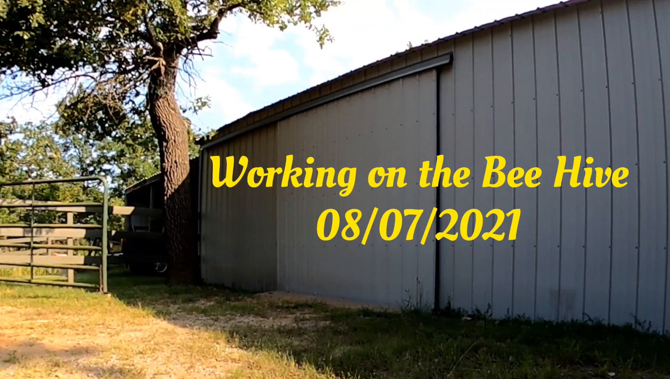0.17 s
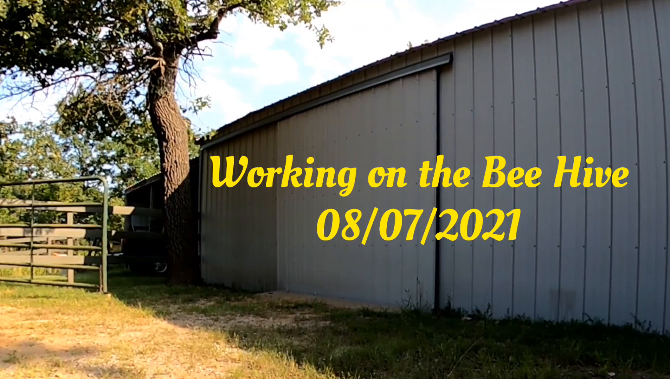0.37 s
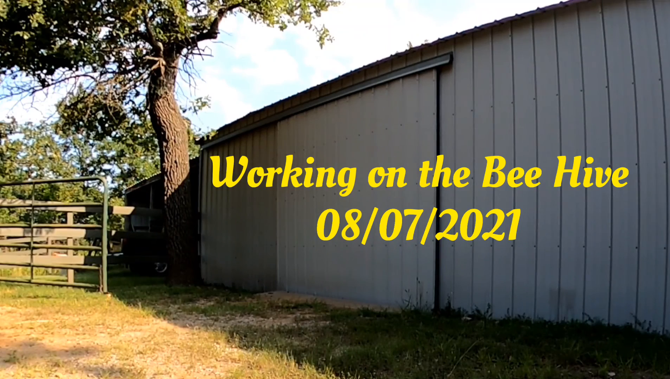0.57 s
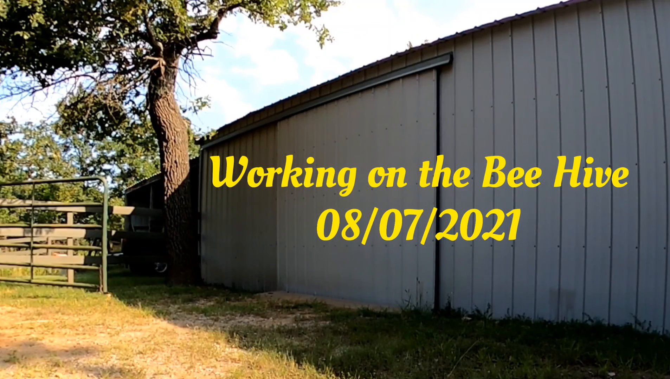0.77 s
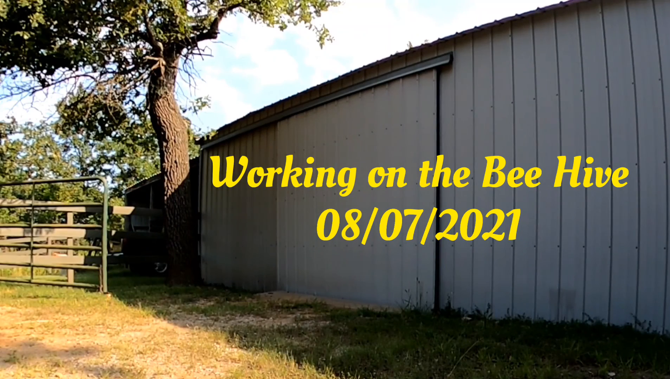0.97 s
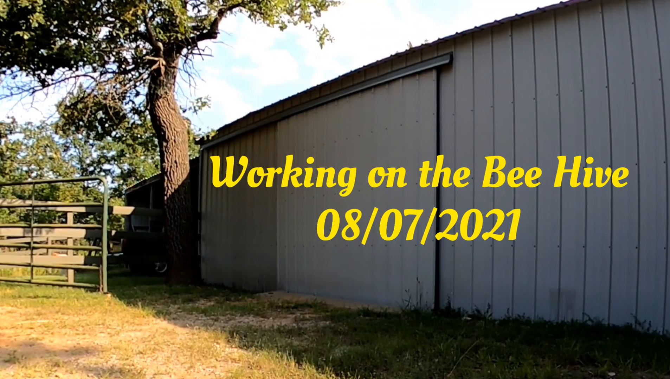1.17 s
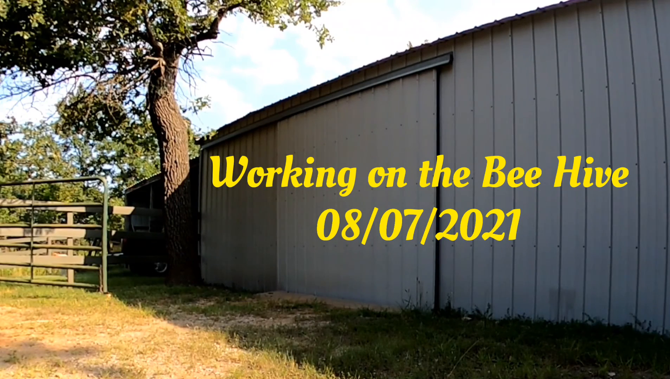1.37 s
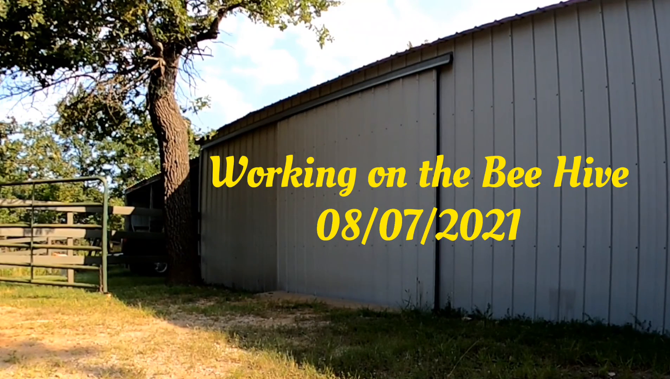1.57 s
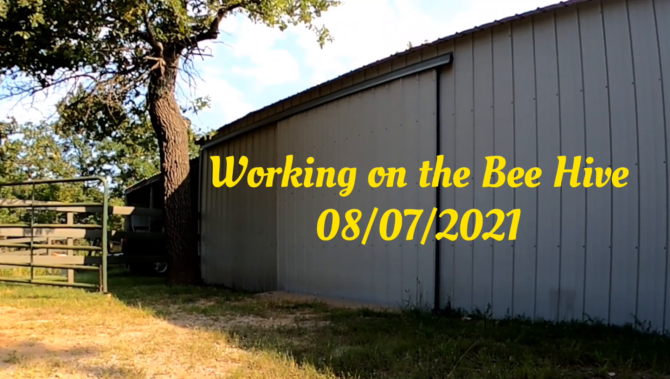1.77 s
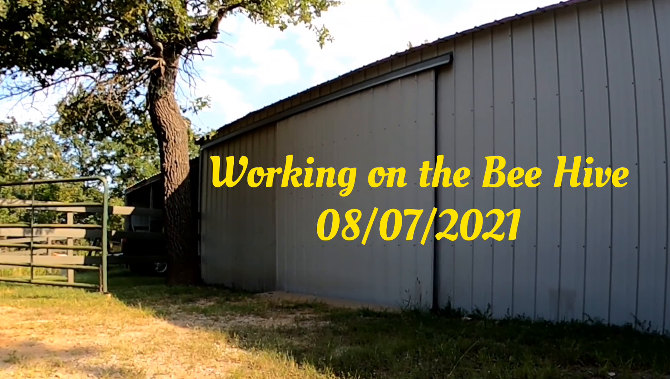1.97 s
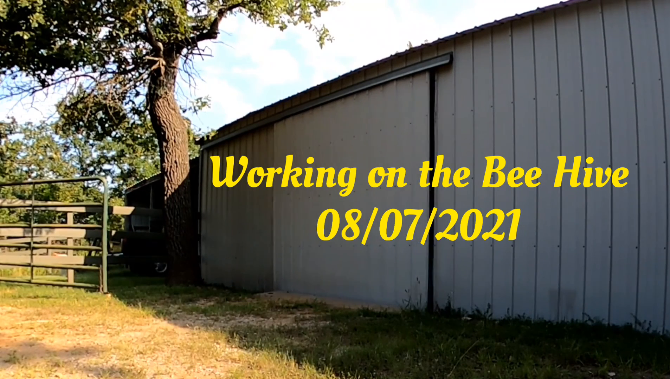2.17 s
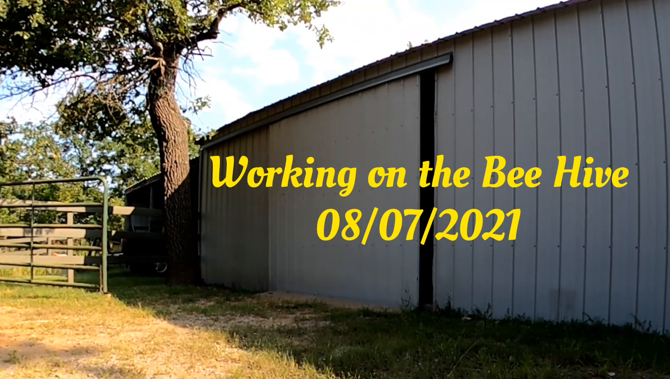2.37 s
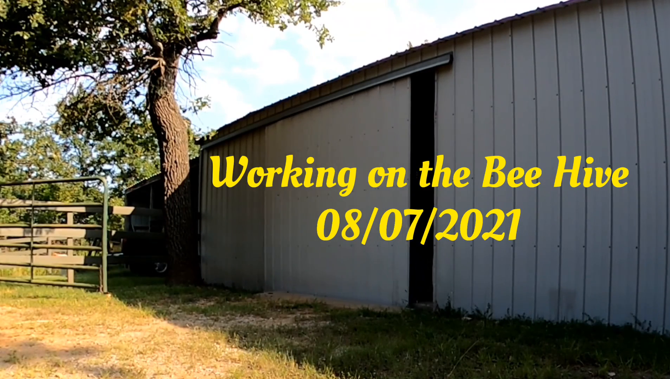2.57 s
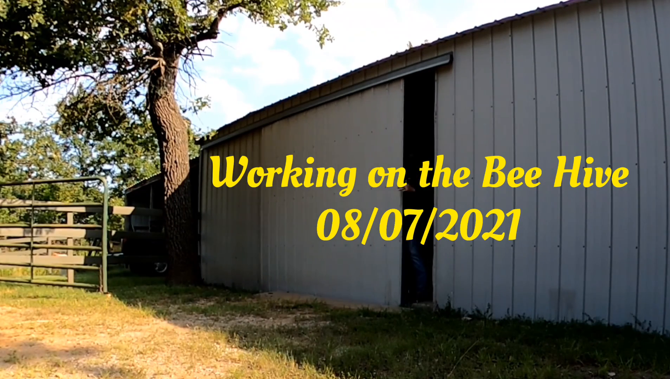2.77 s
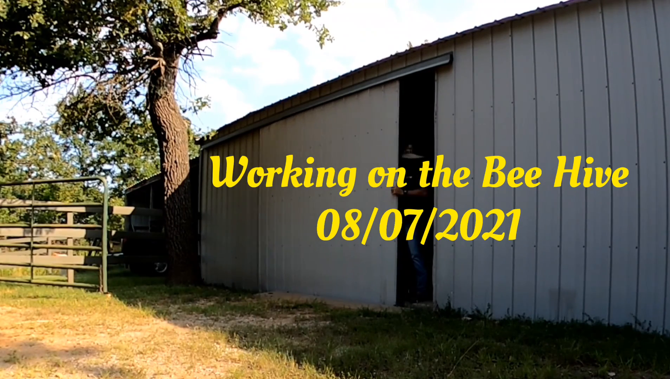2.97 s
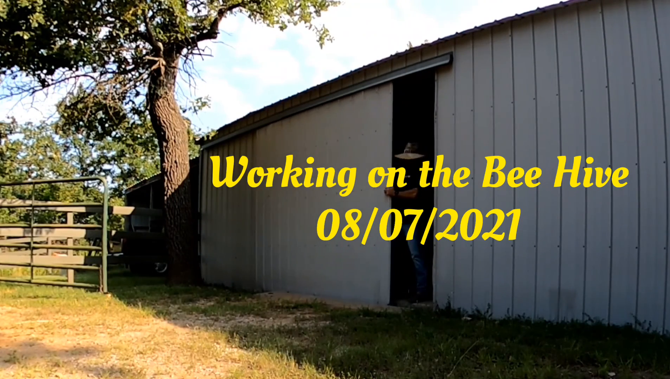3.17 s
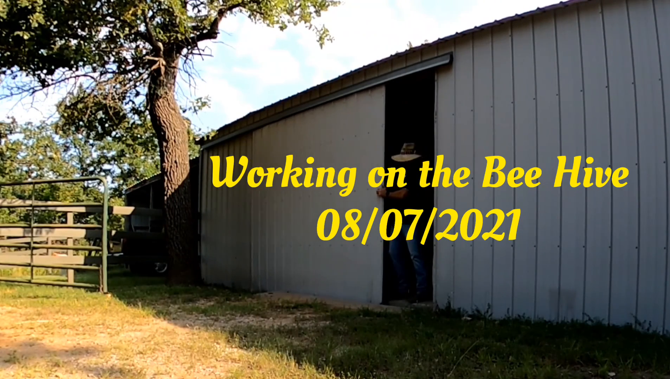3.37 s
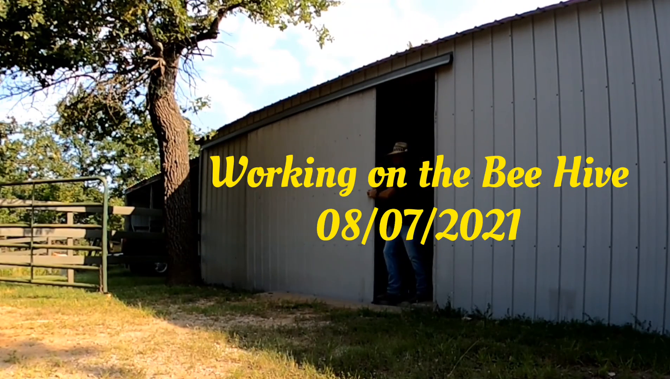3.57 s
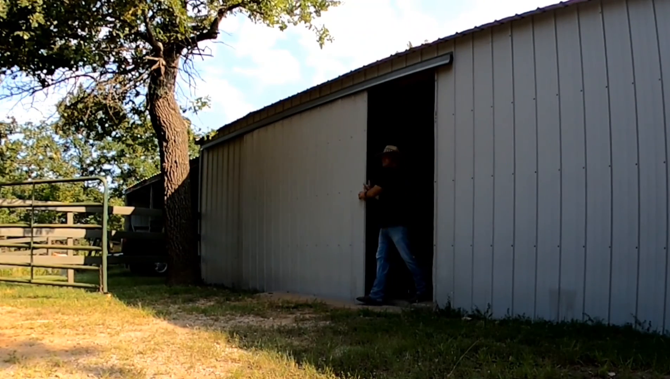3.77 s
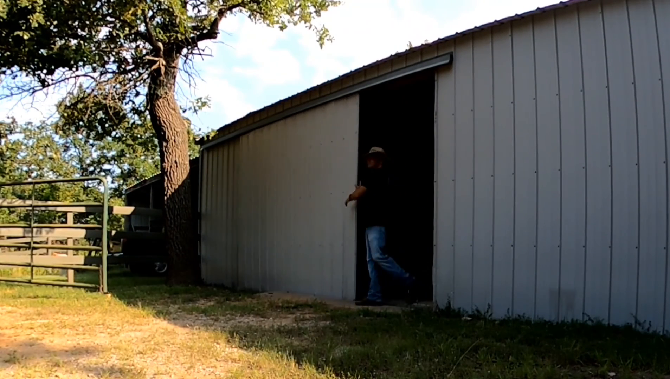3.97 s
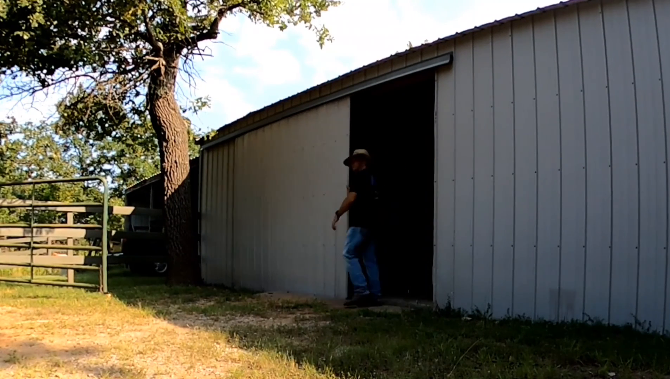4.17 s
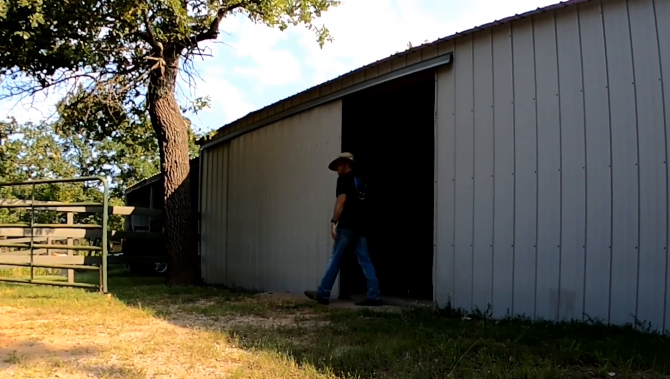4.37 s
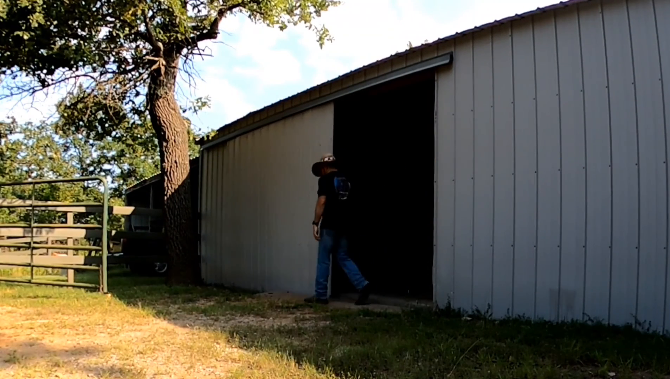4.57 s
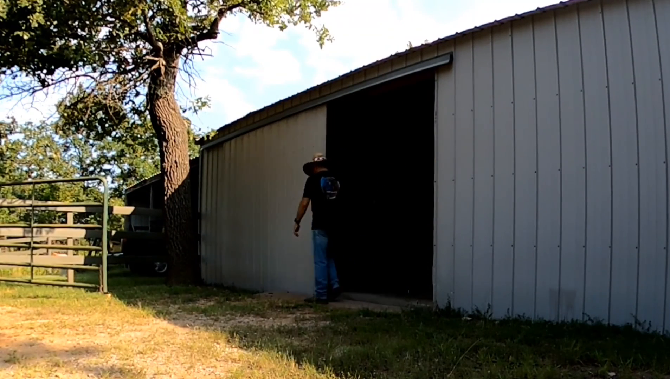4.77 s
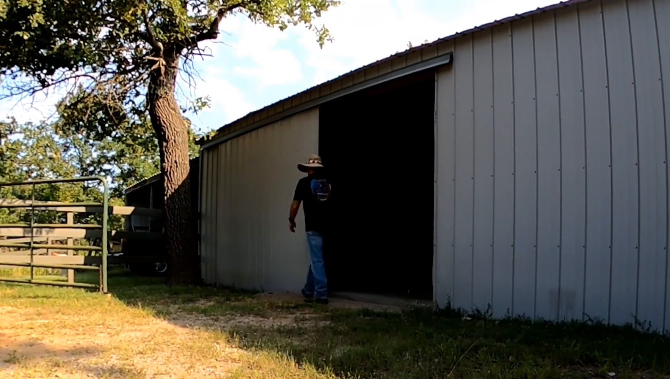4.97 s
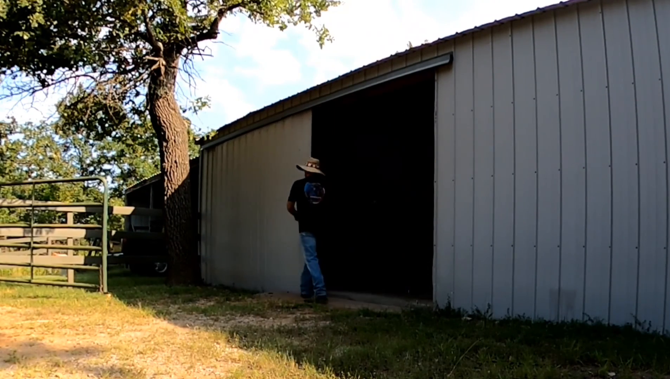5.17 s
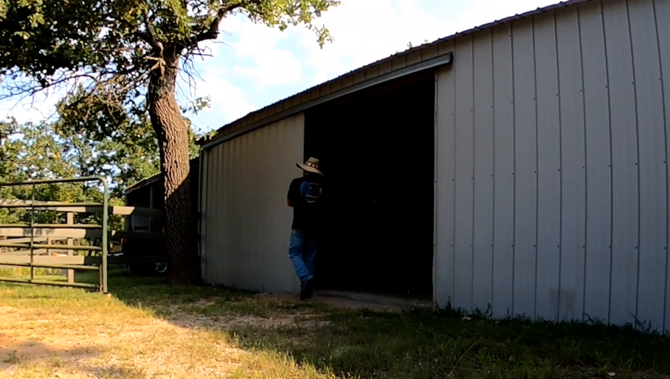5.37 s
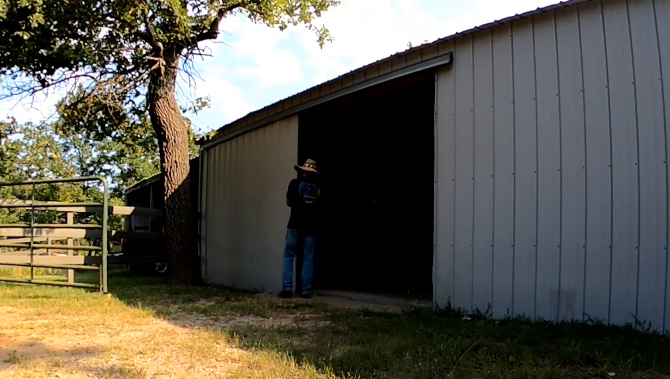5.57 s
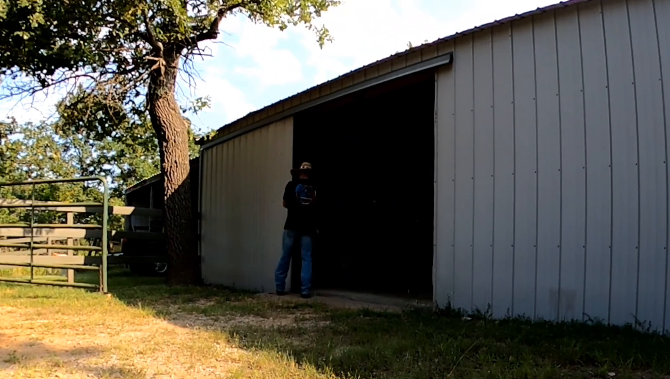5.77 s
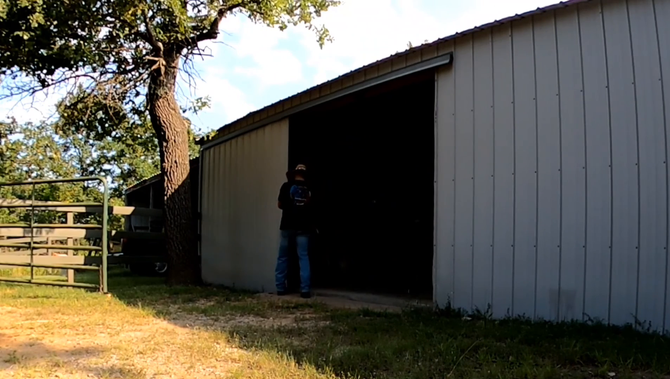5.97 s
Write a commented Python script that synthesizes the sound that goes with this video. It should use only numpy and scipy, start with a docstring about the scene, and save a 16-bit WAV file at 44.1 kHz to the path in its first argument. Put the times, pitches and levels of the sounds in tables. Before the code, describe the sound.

Outdoors beside a metal barn, soft latch clicks and brief scrapes are heard over a faint low hum and insect hiss. The big sliding door then breaks free with a hard scraping crash. Rough wheels rumble on the rail, the hollow panel shudders, and bright clanks strike at uneven moments until the end. Almost mono door sound, with light wide reflections and slightly dulled top treble.

```python
"""A quiet yard with a low drone and faint insects, both filtered noise, lies under the whole scene.
A big sheet-metal barn door is unlatched from inside: knocks and scrapes, gritty noise that dies away.
At two seconds it is jerked loose with a thin sine squeak and rolled along its track: rough noise for
the wheels rumbles through the panel's broad resonances, while the door knocks and scrapes on its guides
and the steel frame rings at its modes, up to a soft end."""
import sys
import numpy as np
from scipy import signal
from scipy.fft import rfft, irfft
from scipy.io import wavfile
from scipy.ndimage import uniform_filter1d

SR = 44100
rng = np.random.default_rng(int(sys.argv[2]) if len(sys.argv) > 2 else 0)


def generate_wav(signal):
    """Clip the signal to [-1, 1] and save it as 16-bit WAV at the path in sys.argv[1]."""
    frames = np.transpose(np.atleast_2d(signal))
    scaled = np.clip(frames, -1, 1) * 32767
    pcm = np.round(scaled).astype(np.int16)
    wavfile.write(sys.argv[1], SR, pcm)


N = 265085

# drone and insects of the yard, relative spectrum: (frequency [Hz], level [dB per Hz])
YARD_SPECTRUM = [(15, -45), (25, -14.5), (70, -9), (81, -6), (102, -2.5), (147, -6), (167, -12), (200, -14),
                 (325, -33.5), (862, -48.5), (1370, -39), (4230, -46.5), (5610, -40), (7440, -55.5),
                 (11500, -55), (15000, -103), (22000, -120)]
# the yard's side signal re its mid signal: (frequency [Hz], level [dB])
YARD_WIDTH = [(40, -16), (150, -33), (400, -9), (1200, 4), (6000, -3.5), (11000, -2)]
# broad low resonances of the door panel: (frequency [Hz], width [Hz], relative level [dB])
PANEL_MODES = [(120, 48, -2.5), (179, 83, 4), (211, 39, -4.5), (254, 87, 0), (366, 91, -5)]
# deepest resonances, the door swaying: (frequency [Hz], width [Hz], relative level [dB])
SWAY_MODES = [(35, 6.9, -10.5), (61.3, 41, -6.5)]
# strength of the sway: (time [s], level [dB])
SWAY_LEVEL = [(0.5, -58), (0.57, -32), (1.51, -61.5), (2.19, -52), (2.4, -28), (2.49, -42.5), (2.57, -35.5),
              (2.63, -42), (2.91, -32.5), (2.94, -35), (3.23, -33), (3.51, -50), (3.58, -36.5),
              (3.8, -40.5), (3.97, -27.5), (4.15, -38), (4.2, -39), (5.43, -47), (5.95, -33.5), (6.01, -41)]
# wheels on the track: (time [s], level [dB], treble re level [dB], panel boom [dB])
ROLL_LEVEL = [(2.0, -81, -5, -72), (2.08, -69, 10.5, -64), (2.24, -51, -3.5, -47), (2.48, -37, -12, -32.5),
              (2.93, -43.5, -4, -34), (3.05, -34, -13, -48), (3.24, -39, -7, -35.5),
              (3.29, -32.5, -9.5, -33), (3.42, -38.5, -9, -30), (3.8, -38, -10, -32),
              (3.95, -38, -14.5, -30.5), (4.18, -37, -12.5, -30.5), (4.34, -34.5, -14.5, -27.5),
              (4.71, -35.5, -17, -32), (5.09, -38.5, -12, -33), (5.36, -36, -13.5, -34.5),
              (5.73, -35, -10, -32.5), (6.01, -39.5, -11, -38)]
# relative spectrum of the wheels: (frequency [Hz], level [dB per Hz])
WHEEL_SPECTRUM = [(210, -16), (350, -4), (377, -6.5), (436, -5.5), (656, -2), (1000, -7.5), (1960, -12.5),
                  (3790, -29.5), (6230, -109.5), (11500, -82), (15000, -106), (22000, -120)]
# treble of wheels rubbing on the rail: (frequency [Hz], relative level [dB])
RUB_SPECTRUM = [(1200, 6), (2800, 9.5), (6200, 4.0), (8000, -6), (11000, -4.5)]
# rings of the steel frame: (frequency [Hz], relative level [dB], fall by 60 dB [s])
FRAME_MODES = [(790, -2, .2), (1200, -3, .15), (1378, -5, .2), (1500, -4, .2), (1690, -4, .2),
               (1850, -4, .2), (2105, -6, .15), (2380, 0, .2), (2700, -3, .15), (2870, -1, .15),
               (3130, -3, .2), (3850, -3, .2), (4140, -5, .15), (5006, -8, .12), (5539, -6, .15),
               (5922, -7, .1), (6220, -8, .1), (6659, -7, .1), (7700, -10, .15), (8190, -9, .2)]
# dense wash of the big sheet: (frequency [Hz], relative level [dB])
WASH_SPECTRUM = [(300, 0), (2000, 3.5), (9000, -9.5)]
# short knocks: (time [s], level [dB], panel boom [dB], treble [dB], low mids [dB],
# loudest zone [Hz], zone gain before its limits [dB])
KNOCK_EVENTS = [(0.6244, -32.5, -41, -3.5, -3, 6200, 4), (0.686, -31.5, -51, -4.5, 0, 1380, 6.5),
                (0.7359, -33.5, -38.5, -3, -1.5, 1680, 8.5), (0.8774, -46.5, -54, -14, 3, 1470, 11),
                (1.0115, -45.5, -48, -10, -5, 1760, 5), (1.393, -47, -56, -7, -2, 1930, -1),
                (1.4908, -45, -56, -8, 1, 1160, 11), (1.953, -46.5, -61, -9, 1, 1240, 4.5),
                (2.0248, -46, -61, -0.5, -16, 1110, -8), (2.1381, -32, -47, -6, 6, 1780, 7),
                (2.2455, -36, -55, -6, -10, 5170, -4), (2.7225, -12, -27, -8.5, 6, 1140, 6),
                (2.7626, -44, -43, 7, 6, 6860, 8), (2.8082, -19, -27.5, -8.5, 16, 1200, 9.5),
                (2.877, -22, -43, -7.5, -3, 2230, 8), (3.1078, -26, -50, -4, 3, 6200, -2),
                (3.3113, -21, -27.5, -5.5, 7.5, 1210, 13), (3.843, -23.5, -35, -13.5, 9, 5040, 6.5),
                (3.877, -20, -34.5, -7.5, 9, 1220, 15), (4.2445, -12, -21.5, -9.5, -14, 1650, 8),
                (5.2894, -13, -31, -9.5, 3, 1280, 8), (5.3337, -20, -41, -8.5, -11, 1260, -5),
                (5.3642, -23.5, -42, -5.5, -16, 2310, 10.5), (5.6224, -14.5, -23.5, -6.5, 14, 1240, 11.5),
                (5.6974, -19.5, -32, -11, 14.5, 4690, -2), (5.9019, -15, -24.5, -12, 9, 1670, -4)]
# contacts with their own length and rise, sliding scrapes and a few heavier knocks: (time [s], level [dB],
# panel boom [dB], treble [dB], low mids [dB], # loudest zone [Hz], zone gain before its limits [dB], contact
# [s], fall by 60 dB before the band factor [s], # rise before the band lag [s], level at end of contact re
# first touch [dB], upper zone [Hz])
SHAPED_CONTACTS = [(0.552, -30, -31, -4, 0, 3020, 5.5, 0.033, 0.38, 0.0042, -4.5, 5500),
                   (0.595, -31, -30, -6, 15, 800, 12.5, 0.02, 0.11, 0.012, -6, 2830),
                   (0.886, -52.5, -64, -12, 9, 694, 15, 0.055, 0.13, 0.0084, -7.5, 1420),
                   (1.094, -31.5, -40, -4, 1, 1700, 7.5, 0.059, 0.29, 0.0017, -7.5, 3200),
                   (2.083, -39, -46.5, -5, 3.5, 1430, 6.5, 0.055, 1, 0.013, -6, 9400),
                   (2.2927, -18.5, -42, -5.5, 3.5, 2060, -1, 0.037, 0.14, 0.0015, 0.5, 5000),
                   (2.326, -4, -28.5, -3.5, -3, 1340, 4.5, 0.024, 0.07, 0.01, -1, 7760),
                   (2.363, -31.5, -31, -6, 14.5, 1320, 18, 0.032, 0.11, 0.0031, -15, 2900),
                   (2.64, -30.5, -32.5, -8, 12, 2560, 0, 0.15, 0.43, 0.01, -4, 6100),
                   (2.979, -22, -25, 1.5, 13.5, 4000, 9.5, 0.043, 0.098, 0.02, -9, 5880),
                   (3.036, -35.5, -31, -18, 6, 3670, 16, 0.061, 0.14, 0.0051, -11, 6200),
                   (3.204, -28, -33, -2, -2, 3620, 9, 0.11, 0.16, 0.0069, -2.5, 5870),
                   (3.544, -15.5, -29.5, 2, 7.5, 2460, 6, 0.07, 0.071, 0.026, -2.5, 3970),
                   (3.625, -18, -31.5, -7, 3.5, 2350, -2, 0.062, 0.14, 0.0027, -2.5, 3800),
                   (4.158, -15, -49, -0.5, 6.5, 760, 4.5, 0.11, 0.13, 0.0081, 2, 6200),
                   (5.175, -35.5, -39, -11, -15, 4070, 9.5, 0.042, 0.32, 0.0029, -9.5, 4960),
                   (5.8426, -7.5, -24.5, -11.5, 3.5, 1410, 3, 0.013, 0.14, 0.01, -3, 2200)]
# timing of a contact by band: (from [Hz], up to [Hz], factor on the fall time, lag added to the rise [s])
CONTACT_BANDS = [(0, 500, 0.86, 0.017), (485.0, 3475, 1.16, 0.00036), (3490, SR, 1.33, 0.003)]
# a roller breaks loose: (time [s], length [s], frequency [Hz], level [dB])
ROLLER_SQUEAK = (2.022, .065, 1110, -60)
# reflections, side re mid: (frequency [Hz], level [dB])
REFLECTION_WIDTH = [(30, -33), (160, -73), (330, -64), (800, -56.5), (1150, -15.5), (4000, -10.5),
                    (9000, -8.5)]
# share of the door put to the left: (frequency [Hz], level [dB])
DOOR_LEFT = [(800, -60), (1100, -26), (4000, -29), (9000, -32)]
# microphone response: (frequency [Hz], gain [dB])
MIC_RESPONSE = [(20, 0), (7800, -4), (8600, -9.5), (10500, -16.5), (12000, -37)]

YARD_DB = -47
# every knock shares one shape
KNOCK_S, KNOCK_T60_S, KNOCK_RISE_S, KNOCK_SWELL_DB = 0.0082, 0.11, 0.0029, -6
BOOM_RISE_S, BOOM_T60_S = 0.027, 0.43  # the panel answers a blow slowly and shudders on
START_S, EDGE_HZ = 0.166, 12000


def amp(db):
    """Level law: 20 dB is a tenfold amplitude."""
    return 10 ** (np.asarray(db) / 20)


def evened(x):
    """Normalisation to unit rms."""
    return x / np.sqrt(np.mean(x ** 2) + 1e-20)


def read(points, hz):
    """Interpolation of a spectrum, linear over logarithmic frequency."""
    f, value = np.transpose(points)
    return np.interp(np.log(hz + 1), np.log(f + 1), value)


def colour(x, points):
    """Linear filtering: the spectrum is multiplied by a gain of (Hz, dB) points."""
    gain = amp(read(points, np.fft.rfftfreq(len(x), 1 / SR)))
    return irfft(rfft(x) * gain, len(x))


def curves(rows):
    """Interpolation in time of each column, at -120 before the first row."""
    s, *columns = np.transpose(rows)
    return [np.interp(np.arange(N) / SR, s, c, left=-120) for c in columns]


def add(mix, s, sound):
    """Superposition: a sound is summed into the mix from its onset in seconds."""
    part = mix[round(s * SR):][:len(sound)]
    part += sound[:len(part)]


def humps(x, modes):
    """Resonance: noise is shaped by the sum of bell-like mode curves."""
    hz = np.fft.rfftfreq(len(x), 1 / SR)
    gain = sum(amp(db) / (1 + (2 * (hz - f) / width) ** 2) for f, width, db in modes)
    return evened(irfft(rfft(x) * gain, len(x)))


def gritty(size, spread_db, grain):
    """Friction on a rough surface: noise whose strength varies from spot to spot, grain samples wide."""
    spots = evened(uniform_filter1d(rng.standard_normal(size), grain))
    return evened(rng.standard_normal(size) * amp(spread_db * spots))


def yard():
    """Broadband ambience: noise filtered into a distant drone and a steady insect hiss."""
    return amp(YARD_DB) * evened(colour(rng.standard_normal(N), YARD_SPECTRUM))


def shudder():
    """Energy summation: rolling feeds the panel's boom, each contact adds a swell that dies away."""
    power = amp(curves(ROLL_LEVEL)[2]) ** 2
    t = np.arange(SR) / SR
    blows = [(k[0], k[2], KNOCK_S) for k in KNOCK_EVENTS]
    blows += [(k[0], k[2], k[7]) for k in SHAPED_CONTACTS]
    for s, db, length in blows:
        fall_db = -60 * np.maximum(t - BOOM_RISE_S - length, 0) / BOOM_T60_S
        swell = np.minimum(t / BOOM_RISE_S, 1) * amp(db + fall_db)
        add(power, s, swell ** 2)
    return np.sqrt(power)


def rumble():
    """Forced vibration: the panel booms at its broad low modes and sways deeper still."""
    boom = humps(gritty(size=N, spread_db=0, grain=400), PANEL_MODES)
    sway = humps(rng.standard_normal(N), SWAY_MODES)
    return shudder() * boom + amp(curves(SWAY_LEVEL)[0]) * sway


def ring(x, level_db, wash_db):
    """Impulse response: convolution adds decaying frame modes and a dense short wash of the sheet."""
    t = np.arange(SR // 2) / SR
    modes = sum(amp(db - 60 * t / t60) * np.sin(2 * np.pi * hz * t) for hz, db, t60 in FRAME_MODES)
    wash = colour(rng.standard_normal(len(t)), WASH_SPECTRUM) * amp(-60 * t / 0.35)
    body = amp(level_db) * modes / np.linalg.norm(modes)
    body += amp(wash_db) * wash / np.linalg.norm(wash)
    return x + signal.fftconvolve(x, body)[:N]


def roll():
    """Roughness excitation: rough wheels on a rough rail, with treble rubbing on its own curve."""
    level_db, treble_db, _ = curves(ROLL_LEVEL)
    # dents in the rail
    bumps = amp(1.4 * evened(uniform_filter1d(rng.standard_normal(N), size=1500)))
    grit = evened(colour(gritty(size=N, spread_db=0.0, grain=150), WHEEL_SPECTRUM))
    fizz = evened(colour(gritty(size=N, spread_db=1.6, grain=100), RUB_SPECTRUM))
    wheels = bumps * amp(level_db) * (grit + amp(treble_db) * fizz)
    return ring(wheels, level_db=-28, wash_db=-14.5)


def contact(db, treble_db, low_mid_db, length, t60, zone_hz, zone_db, rise, swell_db, upper_hz=SR):
    """Friction and free decay: grit rubs while metal touches; mids rise fastest, treble rings longest."""
    t = np.arange(1 << 15) / SR
    grit = gritty(size=len(t), spread_db=1.8, grain=50)
    hz = np.fft.rfftfreq(len(t), 1 / SR)
    shape = [(60, low_mid_db - 15.0), (220, low_mid_db - 0.5), (600, low_mid_db), (1100, 1),
             (1900, 0.88), (3200, -1.5), (6000, treble_db), (10000, 1.7 * treble_db - 6.5)]
    # the default upper zone lies out of hearing
    zones = sum(np.exp(-((hz - f) / (0.08 * f + 90)) ** 2) for f in (zone_hz, upper_hz))
    zone_db = np.clip(zone_db, 0, 16)
    # every spot on the sheet favours other clusters of its countless modes
    lumps = uniform_filter1d(rng.standard_normal(len(hz)), size=150)
    lumps = evened(uniform_filter1d(lumps, size=150))
    spectrum = rfft(grit) * amp(read(shape, hz) + zone_db * zones + 1.5 * lumps)
    length, rise = max(length, 0.002), max(rise, 0.001)
    out = 0
    for lo_hz, hi_hz, slower, lag in CONTACT_BANDS:
        band = irfft(spectrum * (hz >= lo_hz) * (hz < hi_hz), len(t))
        level_db = swell_db * (np.minimum(t / length, 1) - 1)
        # swell_db holds at the first touch with its sign turned
        level_db -= 60 * np.maximum(t - length, 0) / (t60 * slower)
        # the rubbing stops, only the ringing is left
        level_db -= 1.4 * np.clip((t - length) / 0.01, 0, 1)
        out = out + band * amp(level_db) * np.minimum(t / (rise + lag), 1) ** 1.1
    return amp(db) * out / 2  # noise peaks stand about twice over its rms


def squeak():
    """Periodic oscillation: a roller breaks loose in one thin sine with soft edges."""
    _, length, hz, db = ROLLER_SQUEAK
    t = np.arange(0, length, 1 / SR)
    return amp(db) * np.sin(2 * np.pi * hz * t) * signal.windows.tukey(len(t), 0.5)


def clanks():
    """Superposition of contacts: knocks and scrapes set the frame ringing, and one squeak joins."""
    mix = np.zeros(N)
    for s, db, _, treble_db, low_mid_db, zone_hz, zone_db in KNOCK_EVENTS:
        add(mix, s, contact(db, treble_db, low_mid_db, KNOCK_S, KNOCK_T60_S, zone_hz, zone_db,
                            KNOCK_RISE_S, KNOCK_SWELL_DB))
    for s, db, _, treble_db, low_mid_db, zone_hz, zone_db, length, t60, *rest in SHAPED_CONTACTS:
        add(mix, s, contact(db, treble_db, low_mid_db, length, t60, zone_hz, zone_db, *rest))
    mix = ring(mix, level_db=-16, wash_db=-10)
    add(mix, ROLLER_SQUEAK[0], squeak())
    return mix


def reflections(x):
    """Diffuse reflection: wall and ground return the sound with ever-changing phase."""
    z = signal.stft(x, nperseg=512)[2]
    turned = z * np.exp(2j * np.pi * rng.random(z.shape))
    return colour(signal.istft(turned, nperseg=512)[1][:N], REFLECTION_WIDTH)


def scene():
    """Mid and side stereo: a nearly mono door, treble widened by reflections, the yard all around."""
    hits = clanks() + rumble()
    rolling = roll()
    door = hits + rolling
    side = reflections(hits + amp(0.5) * rolling)  # spread-out sources are wider than single blows
    side += colour(yard(), YARD_WIDTH)
    side += colour(door, DOOR_LEFT)  # the door stands a little left
    mid = door + yard()
    return np.array([mid + side, mid - side])


def record(dry):
    """Transducer response: microphone colour, a late start and soft end, then the band limit."""
    t = np.arange(N) / SR
    fades = np.clip(np.minimum(t - START_S, t[-1] - t) / 0.006, 0, 1)
    heard = np.array([colour(c, MIC_RESPONSE) for c in dry]) * fades
    lowpass = signal.firwin(511, EDGE_HZ, window=("kaiser", 9), fs=SR)
    return signal.oaconvolve(heard, lowpass[None], "same")


dry = scene()
out = record(dry)
generate_wav(out)
```